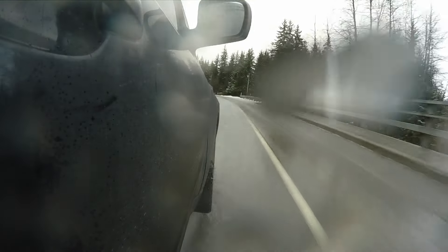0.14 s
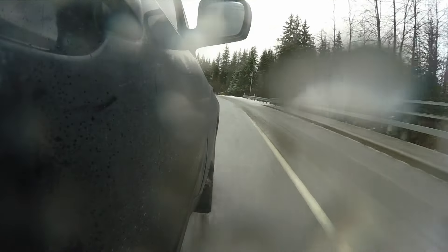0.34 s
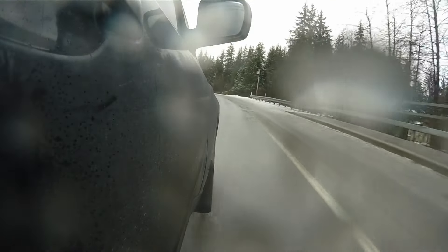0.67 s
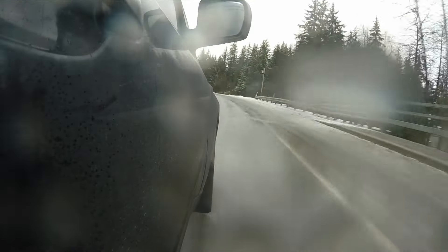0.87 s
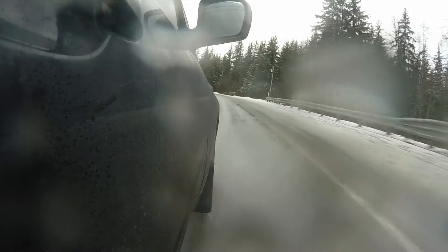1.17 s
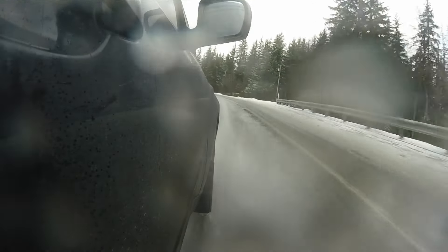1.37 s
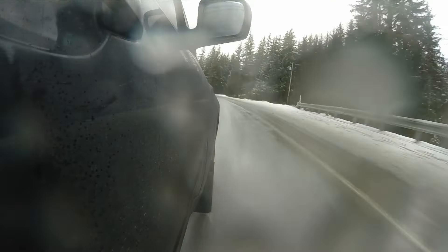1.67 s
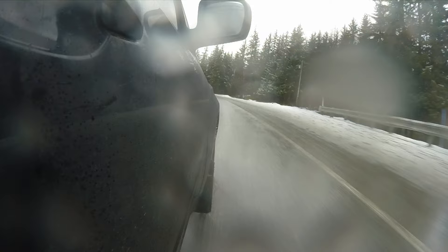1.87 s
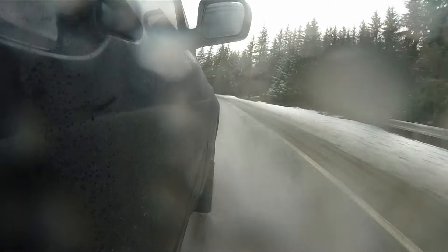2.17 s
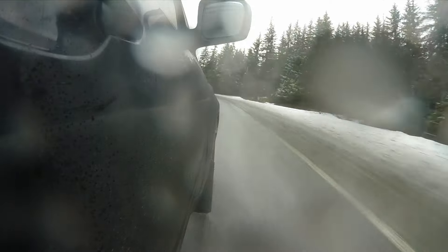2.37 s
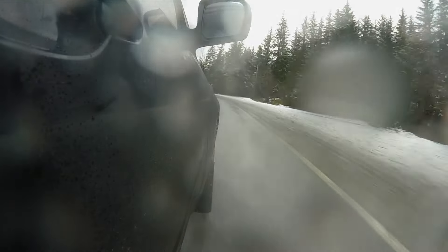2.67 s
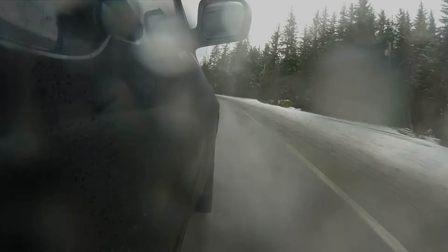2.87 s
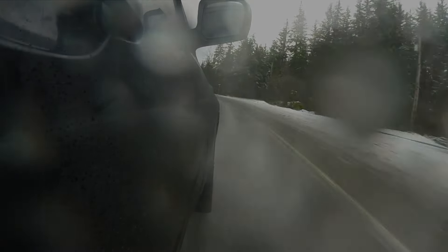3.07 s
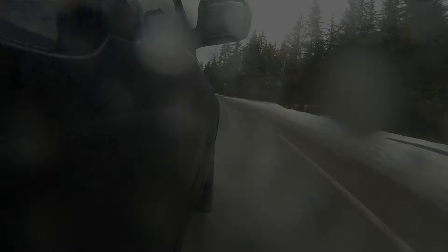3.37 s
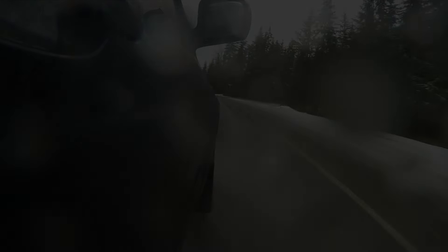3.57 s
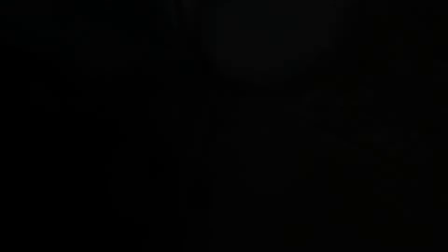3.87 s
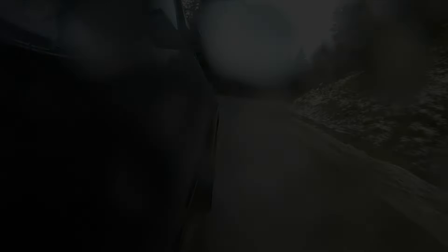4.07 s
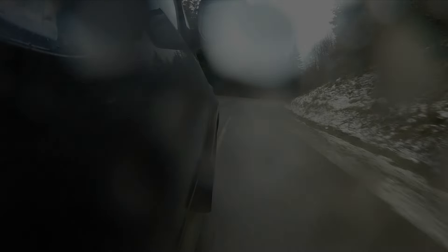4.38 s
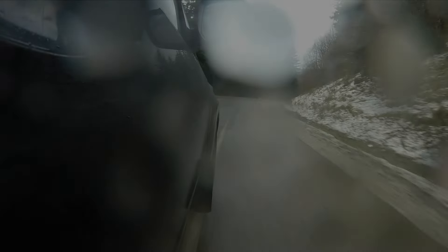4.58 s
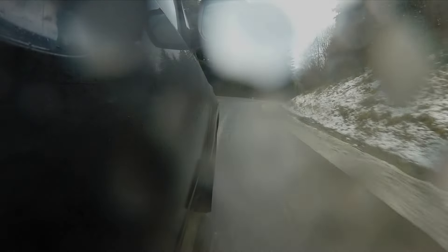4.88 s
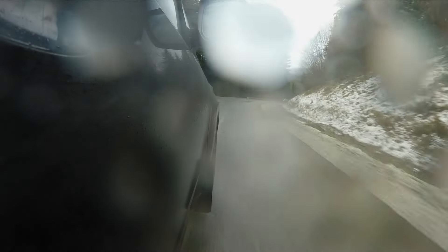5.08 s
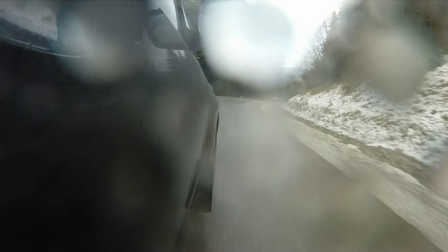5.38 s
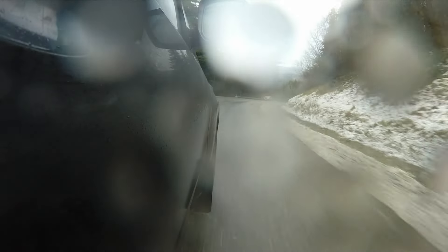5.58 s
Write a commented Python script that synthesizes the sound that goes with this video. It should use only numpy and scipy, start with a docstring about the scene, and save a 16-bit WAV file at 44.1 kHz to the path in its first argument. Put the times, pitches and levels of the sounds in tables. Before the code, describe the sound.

Outdoor driving heard very close and dry, through a boxy, muffled camera housing. Exhaust drone starts strong, with rough overtones, drops away midway and almost disappears. Constant mid-range air and tyre roar throbs with small gusts; the mount rumbles and water clicks on the case, thickest around three seconds. After a short fade, road roar snaps back, exhaust-free, with heavier low buffeting.

```python
"""On the flank of a car cruising a wet road, close by the open exhaust, with the microphone in a camera case.
The exhaust is a sine at the sinking firing rate plus upper orders; noise through resonances makes the
rush of air and tyres, the wind buffets and the door panel; a wavering sine makes the boom of the mount.
Random grains and hiss are road spray, and short rings with bright splashes are drops on the case.
The first stretch fades and cuts hard to a second one without exhaust and with stronger wind buffeting."""
import sys
import numpy as np
from scipy import signal
from scipy.fft import rfft, irfft
from scipy.io import wavfile

SR = 44100
rng = np.random.default_rng(int(sys.argv[2]) if len(sys.argv) > 2 else 0)


def generate_wav(sig):
    """Save sig (samples, or channels by samples) to the path in sys.argv[1] as 16-bit PCM at SR."""
    pcm = np.round(np.clip(np.atleast_2d(sig).T, -1, 1) * 32767).astype(np.int16)
    wavfile.write(sys.argv[1], SR, pcm)


N = 253134

# Exhaust strength along the drive: (time [s], firing tone level [dB], reference level of upper orders [dB])
EXHAUST_LEVELS = [(0, -17, -36.5), (0.25, -20.5, -33), (0.6, -24.5, -34.5), (1.25, -23, -32),
                  (1.9, -33.5, -30), (2.38, -29.5, -34), (2.55, -47, -45), (3.2, -49, -43), (3.6, -38, -38)]
# Resonances of the door panel: (centre [Hz], width [Hz], relative level per Hz [dB])
PANEL_MODES = [(200.6, 25.2, -2.5), (229.8, 20, -11.5)]
# Single drops hitting the case: (time [s], relative ring peak [dB], ring pitch [Hz], relative splash level [dB])
DROP_HITS = [(0.1406, -13, 4460, -30), (0.1537, -11.5, 4300, -32), (0.3344, -16, 4300, -40),
             (0.6056, -12.5, 4620, -30.5), (0.6904, -7.5, 4820, -29), (0.944, -14, 4500, -31),
             (1.1896, -10, 4630, -33), (1.2998, -10, 5900, -41), (1.3209, -9.5, 4100, -31),
             (1.414, -13, 4600, -29), (1.4775, -9.5, 4700, -32), (2.0145, -8, 4510, -27),
             (2.045, -12, 4580, -30), (2.0644, -7, 5880, -25), (2.0842, -16, 5610, -29),
             (2.4495, -15, 4640, -37), (2.672, -15, 4200, -35), (2.816, -2, 4600, -42),
             (2.8314, -16, 5860, -31), (2.8469, -18, 4560, -34), (2.8664, -13.5, 4730, -35),
             (2.959, -15, 4570, -36), (2.995, -6, 4330, -24), (3.021, -15, 4650, -35),
             (3.046, -7.5, 5770, -32), (3.0899, -11, 4610, -31), (3.2906, -4.5, 4600, -23.5),
             (3.5192, -7, 4600, -33), (3.5795, -15, 4550, -38), (4.1016, -13, 4250, -33),
             (4.4044, -12, 4750, -41), (4.4544, -23, 5740, -35), (4.8074, -14, 4530, -34),
             (5.5444, -11, 5600, -29)]


def from_db(db):
    """Decibels to amplitude gain."""
    return 10 ** (np.asarray(db) / 20)


def rms_one(x):
    """Scale to unit power."""
    return x / np.sqrt(np.mean(x ** 2) + 1e-20)


def in_time(rows):
    """Each column of a (time, values...) table, interpolated at every sample."""
    times, *columns = np.transpose(rows)
    return [np.interp(np.arange(N) / SR, times, column) for column in columns]


def drift(rate):
    """Smooth random wander of spread 1: noise through two equal low-pass poles at rate [Hz]."""
    step = 40  # samples between computed points
    pole = np.exp(-2 * np.pi * step * rate / SR)
    noise = rng.standard_normal(N // step + 2002)
    slow = signal.lfilter([1], [1, -2 * pole, pole * pole], noise)[2000:]  # skip the filter's start
    return np.interp(np.arange(N) / step, np.arange(len(slow)), rms_one(slow))


def swell(centre_s, length_s):
    """A smooth bell-shaped rise and fall of height 1; length at half height."""
    offset = 2 * (np.arange(N) / SR - centre_s) / length_s
    return 1 / 2 ** np.minimum(offset ** 2, 60)


def swells(rows):
    """Summed gain of (time [s], peak [dB], length [s]) swells."""
    return sum(from_db(peak_db) * swell(s, length_s) for s, peak_db, length_s in rows)


def colour(x, spectrum):
    """Shape a sound by a (frequency [Hz], gain [dB]) spectrum, interpolated on a log frequency axis."""
    hz, db = np.transpose(spectrum)
    bins = np.maximum(np.fft.rfftfreq(N, 1 / SR), 1)
    gain = from_db(np.interp(np.log(bins), np.log(hz), db))
    return irfft(rfft(x) * gain, N)


def band(x, hz, width, order=2):
    """A resonance as a band-pass with gain 1 on top."""
    edges = np.clip([hz - width / 2, hz + width / 2], 10, .45 * SR)
    sos = signal.butter(order, edges, "band", fs=SR, output="sos")
    return signal.sosfilt(sos, x + 1e-18)


def blown(modes):
    """Turbulence, as separate white noise, drives each resonance on its own."""
    return sum(from_db(db) * band(rng.standard_normal(N), hz, width) for hz, width, db in modes)


def exhaust():
    """Firing tone and upper orders; unequal cylinders give the half orders."""
    # The falling firing rate: (time [s], rate [Hz])
    firing = [(0, 96), (0.25, 94), (0.6, 92.5), (1.25, 90.2), (1.6, 89), (2.25, 86.5), (2.55, 86),
              (3.25, 83.8), (3.84, 83.4)]
    # Upper exhaust orders: (multiple of firing rate, relative level [dB])
    orders = [(1.5, -21), (2, 0), (2.5, -9), (3.5, -21), (4, -27), (4.5, -28), (5.5, -30), (7, -26)]
    # Standing waves of the tailpipe: (centre [Hz], width [Hz], gain added on top [dB])
    pipe_modes = [(390, 17, 17), (496, 16, 13), (585, 14, 18)]
    speed_wobble = .001  # share of the firing rate
    rough_db, uneven_db = 0.6, 1.5  # wander of firing strength, of cylinder balance

    hz, = in_time(firing)
    tone_db, load_db = in_time(EXHAUST_LEVELS)
    phase = 2 * np.pi * np.cumsum(hz * (1 + speed_wobble * drift(20))) / SR
    out = from_db(tone_db + rough_db * drift(8.7)) * np.sin(phase)
    for multiple, order_db in orders:
        # an order swells as it glides through a standing wave of the pipe
        pipe = 1
        for centre, width, lift_db in pipe_modes:
            detuning = 2 * (multiple * hz - centre) / width
            pipe = pipe + from_db(lift_db) / (1 + detuning ** 2)
        waver_db = rough_db * drift(23.0) if multiple == 2 else uneven_db * drift(2.3)
        tone = np.sin(multiple * phase + rng.uniform(0, 2 * np.pi))
        out += pipe * from_db(load_db + order_db + waver_db) * tone
    return np.sqrt(2) * out  # a sine of amplitude sqrt(2) has unit power


def panel_drone(drone_db=-1.0):
    """The door panel hums harder while the exhaust is under load: noise follows the upper-order level."""
    _, load_db = in_time(EXHAUST_LEVELS)
    return from_db(load_db + drone_db) * rms_one(blown(PANEL_MODES))


def airflow(case, steady_buffet_db, panel_db, buffet_db=-3.0):
    """The moving air rings the case in gusts, buffets the mount and drums on the door panel."""
    # Steady strength of the air and tyre rush: (time [s], level [dB])
    flow_levels = [(0, -20), (1.0, -18.5), (1.4, -20.2), (2.15, -17.5), (2.7, -19), (3.0, -21.5),
                   (3.45, -20.5), (3.82, -20), (3.86, -19), (4.3, -17.5), (4.5, -20.5), (5.05, -17.5),
                   (5.3, -18), (5.74, -18.5)]
    # Gusts lift the rush and lulls drop it: (time [s], change [dB], length [s])
    gusts = [(0.056, 2.5, .04), (0.426, 3, 0.045), (0.576, -3.5, 0.037), (1.03, 1, 0.019), (1.188, -4, .03),
             (1.275, 2.5, 0.044), (1.449, -5.5, 0.026), (1.497, 2, 0.037), (1.563, -4.5, 0.034),
             (1.623, 4, 0.021), (2.01, 6, 0.021), (2.148, -5.5, 0.029), (2.24, 4, 0.044),
             (2.271, -8.5, .02), (2.423, -5, 0.038), (2.533, 3.5, 0.022), (2.558, -3.5, 0.037),
             (2.678, -7, 0.017), (2.76, 3.5, 0.11), (2.819, -8.5, 0.045), (2.953, 5.5, 0.024),
             (3.222, 2.5, 0.045), (3.292, -2.5, 0.046), (3.516, 2, 0.014), (3.852, 4, 0.023),
             (3.945, 3.5, 0.029), (4.16, 3.5, 0.077), (4.4, -5.5, 0.034), (4.689, 3.5, 0.026),
             (4.733, -2, 0.015), (5.5, -7, 0.0092), (5.515, 6, 0.034), (5.597, -4.5, 0.024),
             (5.616, 4.5, 0.013), (5.696, 4.5, 0.0078)]
    # Separate wind buffets: (time [s], relative peak [dB], length [s])
    buffets = [(0.22, -26, 0.11), (0.52, -26, 0.2), (1.03, -33, 0.08), (1.32, -22, 0.11),
               (2.05, -22, 0.079), (2.78, -23.5, 0.043), (3.94, -19.5, .17), (4.39, -23, 0.069),
               (5.15, -27, 0.069), (5.42, -31, 0.054), (5.55, -22, 0.076), (5.66, -23, 0.072)]
    # Wind shaking the mount: (centre [Hz], width [Hz], relative level per Hz [dB])
    mount_modes = [(52.3, 14.5, -5.5), (75.9, 18.7, -1), (111.3, 41, -13.5)]

    flow = from_db(in_time(flow_levels)[0])
    gust_db = sum(change_db * swell(s, length_s) for s, change_db, length_s in gusts)
    drumming = from_db(panel_db) * rms_one(blown(PANEL_MODES))
    buffeting = flow * from_db(steady_buffet_db) + from_db(buffet_db) * swells(buffets)
    return flow * (rush(case, gust_db) + drumming) + buffeting * rms_one(blown(mount_modes))


def rush(case, gust_db, flutter_db=0.93, flutter_rate=24, grit_db=1.45, grit_rate=170, roar_throb=0.6):
    """Air and tyre noise ring the case, throbbing with every eddy; the broad roar throbs less."""
    # Broad tyre and air roar between the resonances: (frequency [Hz], relative level per Hz [dB])
    roar_spectrum = [(100, -14), (260, -18.5), (330, -22.5), (520, -22.5), (720, -24.5), (1000, -23),
                     (1300, -33), (3900, -48), (6600, -41), (7800, -43), (15000, -54.5)]
    eddy_db = gust_db + flutter_db * drift(flutter_rate) + grit_db * drift(grit_rate)
    ringing = blown(case) * from_db(eddy_db)
    roar = colour(rng.standard_normal(N), roar_spectrum) * from_db(roar_throb * eddy_db)
    return rms_one(ringing + roar)


def shaking(tremble_db=-38.5):
    """The mount trembles all the time and booms with each jolt."""
    # Jolts of the road swell the shaking: (time [s], peak [dB], length [s])
    jolts = [(0.04, -16.5, 0.14), (0.24, -18.5, 0.088), (0.44, -13.5, 0.22), (0.74, -17.5, .15),
             (1.0, -15, 0.1), (1.22, -18, 0.13), (1.46, -14, .19), (1.79, -19, 0.23), (2.02, -21.5, 0.1),
             (2.29, -20.5, 0.14), (2.51, -24, 0.12), (2.92, -18, 0.26), (3.21, -21.5, 0.17),
             (3.5, -24.5, 0.25), (3.96, -19, 0.039), (4.3, -15, 0.21), (4.6, -19, 0.51), (4.87, -15, 0.084),
             (5.26, -12.5, 0.23), (5.57, -23, 0.19), (5.72, -15.5, 0.11)]
    return (from_db(tremble_db) + swells(jolts)) * boom()


def boom(boom_hz=38.35, wander=0.036, swell_db=0.67, wander_rate=16):
    """The mount's lowest resonance as a sine, unsteady in rate (wander is a share of it) and depth."""
    phase = 2 * np.pi * np.cumsum(boom_hz * (1 + wander * drift(wander_rate))) / SR
    return rms_one(np.sin(phase) * from_db(swell_db * drift(7.9)))


def drops(ring_db=-1.0, splash_db=-7.5, ring_width=1200, burst_s=0.00065):
    """Each drop is a sub-millisecond slap: a short ring of the case wall and a bright splash."""
    # High modes of the case wall that a splash excites: (centre [Hz], width [Hz], relative level [dB])
    wall_modes = [(9650, 2400, 7.5), (12300, 3000, 1)]
    rings, slaps = np.zeros(N), np.zeros(N)
    t = np.arange(1024) / SR
    impulse = 1.0 * (t == 0)
    for s, peak_db, hz, bright_db in DROP_HITS:
        ring = band(impulse, hz, ring_width)
        slap = rms_one(rng.standard_normal(len(t)) * np.exp(-t / burst_s))
        i = round(s * SR)
        rings[i:i + len(t)] += from_db(peak_db + ring_db) * ring / np.abs(ring).max()
        slaps[i:i + len(t)] += from_db(bright_db + splash_db) * slap
    return rings + sum(from_db(db) * band(slaps, hz, width) for hz, width, db in wall_modes)


def wet_road(spray_db=6.0, patchy_db=1.0, patchy_rate=9):
    """Patchy mist, passing sheets of spray and the fine spray that comes with each drop."""
    # Wetness of the road, heard as steady mist: (time [s], relative level [dB])
    wetness = [(0, -50), (1.6, -48), (2.1, -55), (2.9, -46), (3.2, -48), (3.8, -49), (4.1, -53),
               (4.4, -55.5), (5.74, -56)]
    # Sheets of spray thrown up by the wheel: (time [s], relative peak [dB])
    sheet_peaks = [(0.01, -41), (0.3, -43), (0.96, -44), (1.175, -42), (1.79, -41), (2.075, -43),
                   (2.17, -42), (2.28, -36), (2.405, -40), (2.51, -42), (2.59, -37), (2.68, -43),
                   (2.77, -40), (3.46, -39.5), (3.56, -47), (3.719, -33), (3.91, -42), (3.959, -47),
                   (4.11, -40), (4.455, -46), (4.62, -49), (4.8, -50), (5.125, -41), (5.45, -41.5),
                   (5.675, -42.5)]
    sheet_s, wake_s = 0.033, 0.048  # length of a sheet, of the fine spray around a drop
    wake_db = -17  # fine spray against the drop's splash level

    mist_db, = in_time(wetness)
    mist = from_db(mist_db + patchy_db * drift(patchy_rate))
    sheets = swells((s, peak_db, sheet_s) for s, peak_db in sheet_peaks)
    wakes = swells((s, splash_db + wake_db, wake_s) for s, _, _, splash_db in DROP_HITS)
    return from_db(spray_db) * (mist + sheets + wakes) * spray()


def spray(per_s=2500, size_db=8.5, clump_db=2.0, mist=0.5):
    """Fine droplets, as random single-sample clicks, swell in clumps together with a hiss of mist."""
    # Hiss of fine spray: (frequency [Hz], relative level per Hz [dB])
    hiss_spectrum = [(2000, 1.5), (3700, -5.5), (4500, 11.5), (5200, 2.5), (6000, 9), (7700, -4.5),
                     (9200, 2.5), (10700, -5), (11600, -2), (13000, -10.5), (15500, -15)]
    sizes = from_db(size_db * np.minimum(rng.exponential(1, N), 4)) * rng.choice([-1, 1], N)
    droplets = rms_one(sizes * (rng.random(N) < per_s / SR))
    clumped = (droplets + mist * rng.standard_normal(N)) * from_db(clump_db * drift(33))
    return rms_one(colour(clumped, hiss_spectrum))


def scene():
    """Two stretches of road: the first fades out, the second cuts in hard."""
    # Air resonances of the case in each stretch: (centre [Hz], width [Hz], relative level per Hz [dB])
    case_first = [(1523, 235, -4), (1903, 228, -11.5), (2330, 164, -16), (2784, 570, -11.5),
                  (3403, 450, -16.5), (4470, 650, -27), (5890, 880, -27)]
    case_second = [(1576, 283, -5.5), (1876, 290, -10.5), (2280, 190, -16.5), (2627, 490, -11),
                   (3360, 390, -20), (4400, 760, -25), (5790, 840, -27)]
    cut_s = 3.843
    fade_end_s, fade_s = 3.885, 0.48  # the straight fade would reach silence just after the cut

    t = np.arange(N) / SR
    road = shaking() + wet_road()
    first = airflow(case_first, steady_buffet_db=-6.5, panel_db=-15.5) + road + exhaust() + panel_drone()
    second = airflow(case_second, steady_buffet_db=-3.5, panel_db=-14.0) + road
    fade = np.clip((fade_end_s - t) / fade_s, 0, 1)
    stretches = np.where(t < cut_s, fade * first, second)
    return (stretches + drops())[None]  # the drops stay outside the fade


def record(dry):
    """The microphone signal has its peaks rounded, then its top cut by a steep low-pass."""
    cutoff_hz = 15500
    rounded = dry / (1 + (dry / .85) ** 6) ** (1 / 6)
    return signal.sosfilt(signal.ellip(10, .1, 90, cutoff_hz, fs=SR, output="sos"), rounded)


dry = scene()
out = record(dry)
generate_wav(out)
```